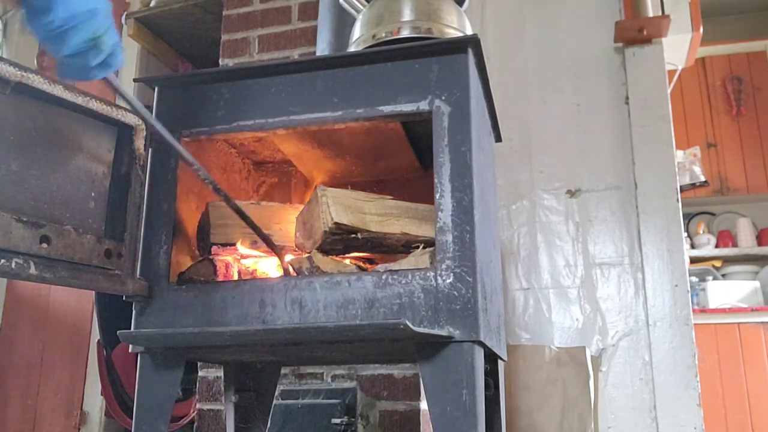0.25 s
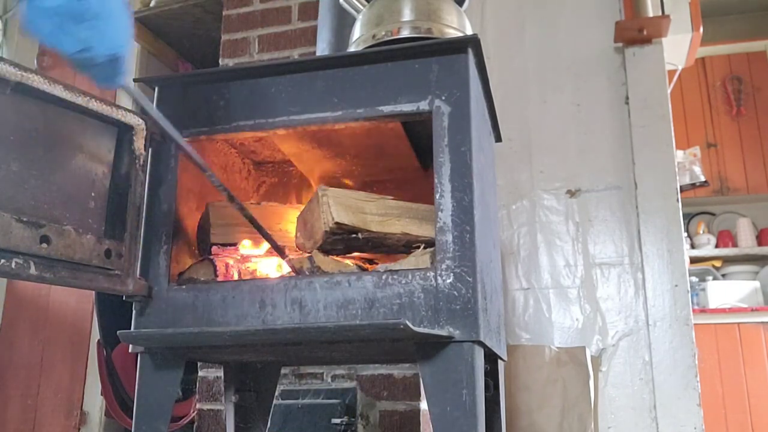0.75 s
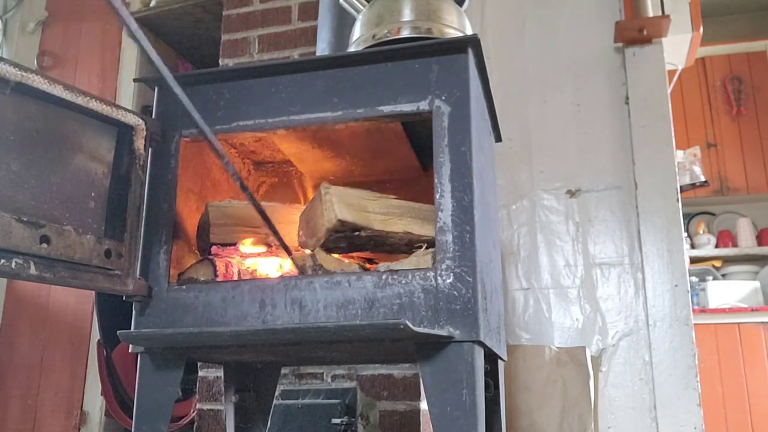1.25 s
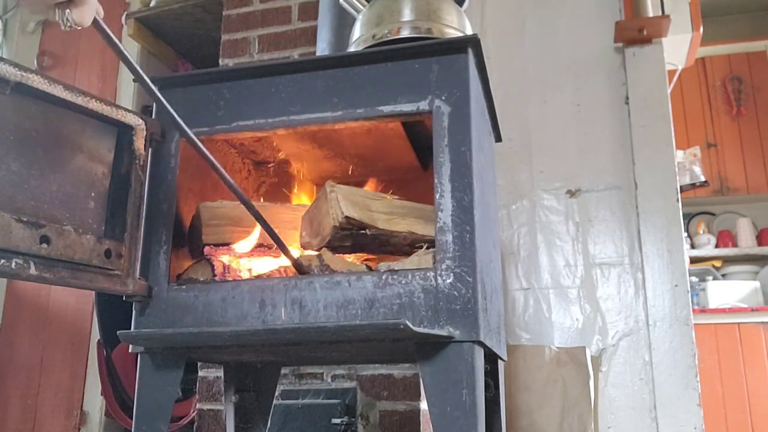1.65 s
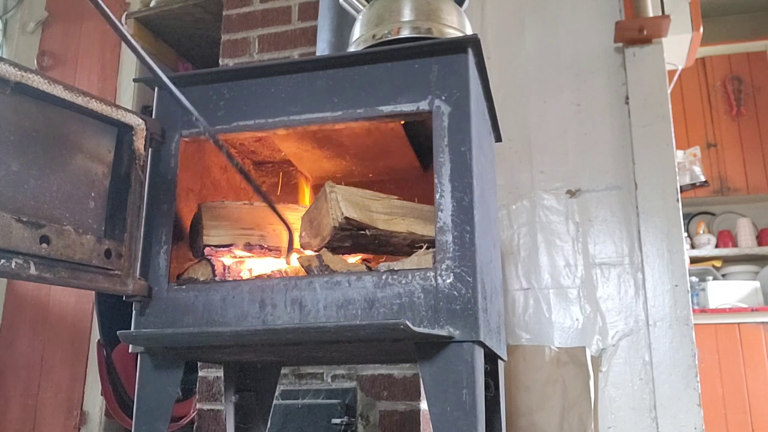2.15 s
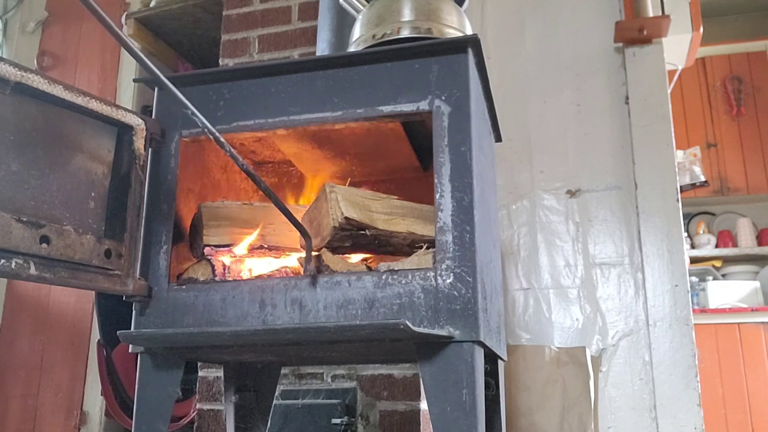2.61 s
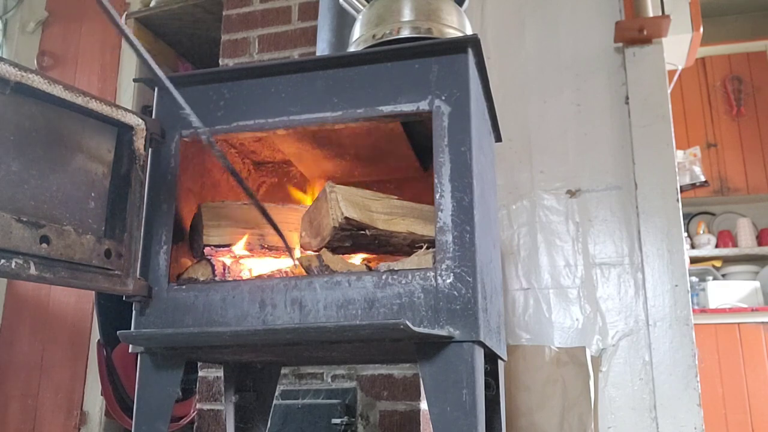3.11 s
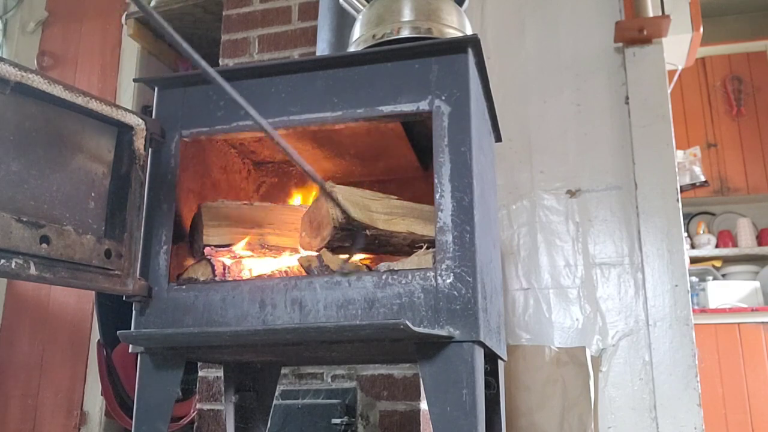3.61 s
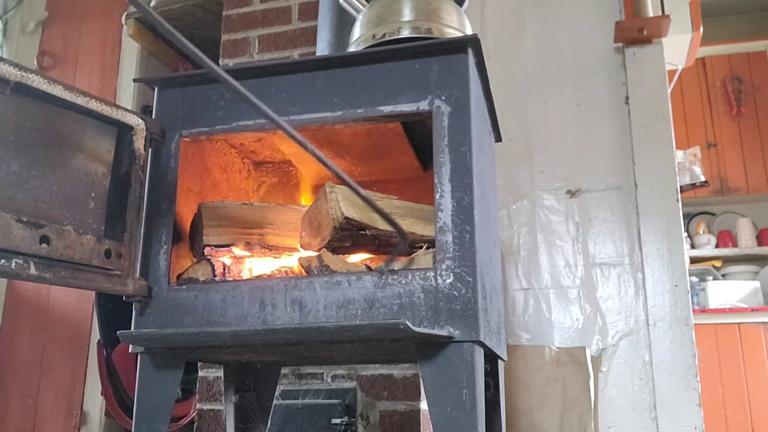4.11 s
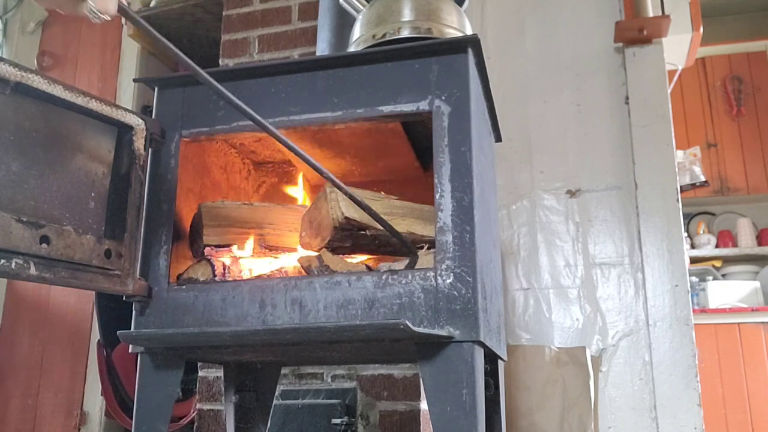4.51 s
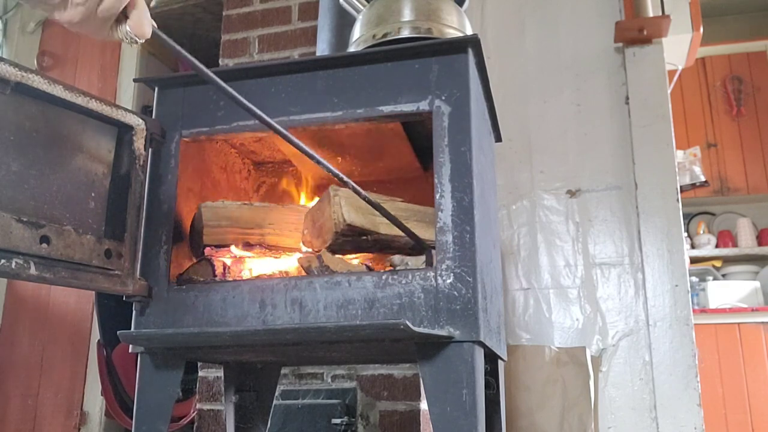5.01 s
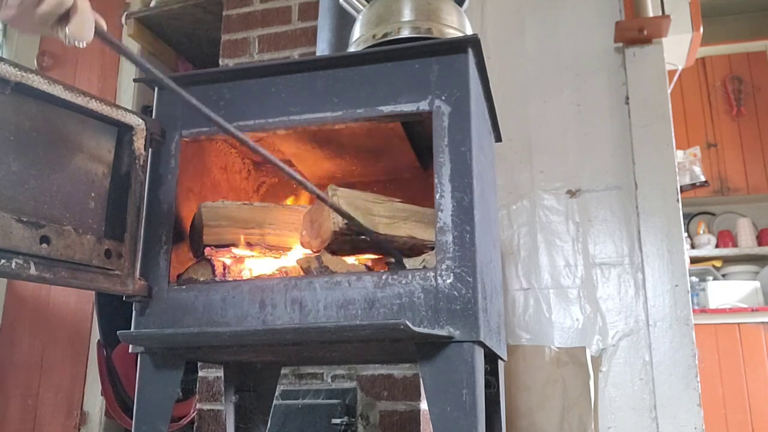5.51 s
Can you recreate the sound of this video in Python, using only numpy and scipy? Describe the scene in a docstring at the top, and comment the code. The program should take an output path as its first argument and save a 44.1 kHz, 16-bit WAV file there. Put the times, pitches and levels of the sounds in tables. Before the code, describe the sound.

Heard near the open door of an indoor wood stove, a metal poker stirs brittle embers and shoves logs. The crunching builds to a sharp, loud clank that echoes briefly in the steel box. Softer ringing knocks, a wooden thump, charcoal ticks and light scraping follow at intervals. Underneath runs the deep rumble and soft hiss of the fire, briefly quieter after the hardest hit.

```python
"""A steel poker knocks against the firebox of an open wood stove, stirs the coals and shoves the logs.
Each knock cracks, rings the plates and the poker, and echoes in the box. Strokes crunch coals and
rasp bark in streams of tiny fractures; logs thud, charcoal snaps. Underneath, the fire rumbles in box
and flue with a soft hiss. The hardest clank ducks the gain control, and the fire slowly swells back."""
import sys
import numpy as np
from scipy import signal
from scipy.fft import rfft, irfft, next_fast_len
from scipy.io import wavfile
from scipy.ndimage import uniform_filter1d, minimum_filter1d

SR = 44100
rng = np.random.default_rng(int(sys.argv[2]) if len(sys.argv) > 2 else 0)


def int16_out(signal):
    """Quantize to a 16-bit WAV file."""
    q = np.round(np.clip(np.atleast_2d(signal).T, -1, 1) * 32767)
    wavfile.write(sys.argv[1], SR, q.astype(np.int16))


N = 253719
TIME = np.arange(N) / SR
TAIL = TIME[:SR * 3 // 5]  # time axis of one impact


# Firebox plate modes: f/Hz, level/dB, t60/s
PLATE_MODES = [(248.5, -13, .35), (363.4, -24, 0.64), (430, -21.5, 0.23), (540, -26.5, 0.67),
               (695, -33, 0.12), (700, -18, 0.22), (895, -15.5, 0.51), (1001, -19.5, 0.68),
               (1059, -23, 0.73), (1177, -31.5, 0.89), (1202, -20, 0.24), (1570, -39.5, 0.22),
               (1480, -30.5, 0.14), (1690, -24.5, 0.31), (1790, -21.5, 0.6)]
# Poker modes: f/Hz, level/dB, t60/s
POKER_MODES = [(2104, -14.5, 0.17), (2213, -21.5, 0.54), (2160, -11.5, 0.28), (2395, -18, 0.27),
               (2483, -11, 0.14), (2860, -27, 0.18), (3440, -16.5, 0.25), (3670, -23, 0.14),
               (3947, -28.5, 0.186), (4570, -26, .15)]
# Blows: t/s, level/dB, rise/s, low cut/Hz, treble corner/Hz, roll-off/(dB/oct),
# plate ring/dB, poker ring/dB, t60 factor
POKER_BLOWS = [(0.238, -23, 0.0058, 540, 1290, 23.5, -14, -13, 1.1),
               (0.423, -23.5, 0.00091, 198, 450, 8.5, -10.5, -10, 2.1),
               (1.381, -11.5, 0.002, 225, 500, 23, -6.5, -23, .85),
               (1.620, 5, 0.00095, 857, 2203, 6.5, -1, 1, 0.94),
               (2.999, -11, 0.0019, 380, 2450, 12, -1.5, -11, 0.76),
               (3.661, -33.5, 0.00083, 380, 1780, 7, -22, -12, 0.74),
               (4.022, -8, 0.00032, 330, 850, 12.5, 0.5, -18, 0.72),
               (4.071, -17.5, 0.0027, 650, 980, 10.5, -10.5, -8, 1.06),
               (4.168, -29.5, 0.0017, 494, 1370, 16, -11, -10, 1.3),
               (4.652, -16, 0.00009, 166, 1530, 24, -7.5, -24, 0.39),
               (5.146, -18, 0.004, 415, 1210, 18, -12, -3, 0.92)]

def blows(echo_db=-1, crack_db=1, crack_t60_s=0.022, ring_db=-3):
    """Each blow cracks, rings the steel and echoes; hard contacts are bright, shoves deep and gradual."""
    out = np.zeros((2, N))
    for s, db, rise_s, low_hz, corner_hz, db_per_oct, plate_db, poker_db, t60_scale in POKER_BLOWS:
        plates = undb(plate_db) * steel_ring(PLATE_MODES, t60_scale)
        poker = undb(poker_db) * steel_ring(POKER_MODES, t60_scale)
        crack = undb(crack_db) * diffuse(len(TAIL)) * fade(TAIL, crack_t60_s)
        hit = crack + undb(echo_db) * echoes(t60_scale) + undb(ring_db) * (plates + poker)
        hit *= 1 - np.exp(-TAIL / rise_s)
        hit = shape(hit, lambda hz: undb(-db_per_oct * np.log2(1 + (hz / corner_hz) ** 4) / 4))
        low_cut = signal.butter(6, low_hz, "high", fs=SR, output="sos")
        add(out, s, undb(db) * signal.sosfilt(low_cut, hit))
    return out


def steel_ring(modes, t60_scale, max_detune=0.01294, twin_gain=0.97):
    """Struck steel: each mode beats against a close twin and reaches the two ports out of step."""
    mid = side = 0
    for hz, db, t60_s in modes:
        start, bearing, detune_angle = rng.uniform(0, 2 * np.pi, 3)
        phase = 2 * np.pi * hz * TAIL + start
        twin_phase = phase * (1 + max_detune * np.cos(detune_angle))
        envelope = undb(db) * fade(TAIL, t60_s * t60_scale)
        mid += envelope * (np.sin(phase) + twin_gain * np.sin(twin_phase))
        side += envelope * side_share(hz) * np.sin(bearing) * np.cos(phase)
    return stereo(mid, side)


# Breaking charcoal spectrum: f/Hz, level/dB
COAL_SPECTRUM = [(300, -27), (1000, -28), (1600, -9.5), (2800, -3), (4500, -1.5), (6000, -4), (8000, -3.5),
                 (11000, -3), (15000, 0)]
# Scraped bark spectrum: f/Hz, level/dB
BARK_SPECTRUM = [(120, -14), (300, -5), (600, 5), (1100, -2.5), (1600, -2.5), (2500, -3), (6000, -22)]
# Strokes: peak t/s, build-up/s, release/s, coal crunch/dB, bark rasp/dB
POKER_STROKES = [(0.081, 0.028, 0.08, -44, -46.5), (0.153, 0.047, 0.036, -37.5, -43),
                 (0.262, 0.13, 0.15, -41.5, -45.5), (0.430, .01, 0.18, -45.5, -50),
                 (0.485, 0.023, 0.26, -49, -47), (0.572, .01, 0.17, -44, -60),
                 (0.990, 0.14, 0.14, -36, -54.5), (1.186, 0.034, 0.15, -27, -61),
                 (1.299, 0.024, 0.069, -29.5, -70), (1.485, 0.28, .09, -31, -36.5),
                 (1.570, .08, 0.15, -32.5, -38), (2.174, 0.089, 0.24, -48.5, -45),
                 (4.830, 0.15, 0.04, -55.5, -51), (5.066, 0.2, 0.049, -40, -50.5),
                 (5.154, 0.12, 0.16, -41, -38.5), (5.605, .015, 0.39, -45, -51)]

def stirring(range_db=21.5, coals_db=-2, bark_db=-0.5):
    """Each stroke builds until the embers give way, then eases; it crunches coals and rasps bark."""
    on_coals = on_bark = 0
    for s, build_s, release_s, crunch_db, rasp_db in POKER_STROKES:
        force = undb(-range_db * np.maximum((s - TIME) / build_s, (TIME - s) / release_s))
        on_coals += undb(crunch_db) * force
        on_bark += undb(rasp_db) * force
    coals = colour(fractures(per_s=570, spread_db=5.5, t60_scale=1), COAL_SPECTRUM)
    bark = colour(fractures(per_s=350, spread_db=4, t60_scale=0.42), BARK_SPECTRUM)
    return undb(coals_db) * unit_rms(coals) * on_coals + undb(bark_db) * unit_rms(bark) * on_bark


def fractures(per_s, spread_db, t60_scale, direct=1):
    """Tiny fractures of uneven size, heard directly and through the firebox."""
    sizes = undb(spread_db * np.minimum(rng.exponential(size=N), 5))
    clicks = (rng.random(N) < per_s / SR) * sizes * rng.choice([-1, 1], N)
    response = echoes(t60_scale) * (1 + direct * fade(TAIL, t60_s=0.0038))
    return unit_rms(signal.fftconvolve(clicks[None], response, axes=1)[:, :N])


# Logs dropping on the bed: t/s, level/dB, f/Hz, swell/s
LOG_DROPS = [(0.425, -28, 255, 0.0027), (1.381, -27.5, 284, 0.0042), (1.498, -25.5, 160, 0.011),
             (3.040, -27.5, 330, 0.0034), (4.032, -13.5, 124, 0.0094)]

def log_thuds():
    """A log lands softly: a few low cycles swell and die."""
    out, t = np.zeros((2, N)), TIME[:SR]
    for s, db, hz, swell_s in LOG_DROPS:
        envelope = undb(db) * t / swell_s * np.exp(1 - t / swell_s)
        add(out, s, stereo(envelope * np.sin(2 * np.pi * hz * t), 0))
    return out


# Charcoal snaps: t/s, level/dB
COAL_SNAPS = [(0.423, -23.5), (0.437, -29.5), (0.569, -27), (0.983, -34), (1.165, -27), (1.412, -34),
              (1.496, -16.5), (1.562, -23), (1.955, -37), (3.602, -40), (4.560, -37), (4.655, -32),
              (4.710, -36.5), (5.109, -29.5), (5.126, -34)]

def coal_snaps(tick_t60_s=0.0065, echo_db=-12):
    """Charcoal breaks with a bright tick and a short echo."""
    out = np.zeros((2, N))
    echo = undb(echo_db) * echoes(t60_scale=0.99)
    for s, db in COAL_SNAPS:
        tick = diffuse(len(TAIL)) * fade(TAIL, tick_t60_s)
        add(out, s, undb(db) * (tick + echo))
    return colour(out, COAL_SPECTRUM)


# Flame rumble spectrum: f/Hz, level/dB
RUMBLE_SPECTRUM = [(15, -72.5), (30, -71.5), (43, -65), (55, -58), (80, -59), (110, -64.5), (150, -62.5),
                   (210, -72), (320, -72.5), (420, -79), (600, -82), (800, -97.5), (1400, -99),
                   (3000, -115)]
# Flame-driven air resonances: f/Hz, half-width/Hz, level/dB
FLUE_MODES = [(64.36, 4.5, -38), (138.2, 18, -46.5), (305, 18.4, -54), (333.7, 5.5, -53)]
# Strength of the draught: t/s, level/dB
DRAUGHT_CURVE = [(0, 4), (0.8, 1), (1.5, 4.5), (2.0, -0.5), (2.7, -2), (3.2, 0), (5.75, 0.5)]
# Wood hiss spectrum: f/Hz, level/dB
HISS_SPECTRUM = [(700, -106), (1500, -103), (2400, -101), (3100, -92), (4500, -94), (6000, -97),
                 (8000, -94.5), (15000, -93.5)]

def fire(rumble_gain_db=43, hiss_gain_db=41, flutter_db=0.12, waver_db=-1.5, sizzle_db=-10):
    """Flames rumble and boom in the box and flue; the wood hisses and sizzles faintly."""
    roar = undb(rumble_gain_db) * colour(diffuse(N), RUMBLE_SPECTRUM)
    for centre_hz, half_width_hz, db in FLUE_MODES:
        boom = shape(diffuse(N), lambda hz: 1 / (1 + ((hz - centre_hz) / half_width_hz) ** 2))
        roar += undb(db) * unit_rms(boom)
    sizzle = undb(sizzle_db) * fractures(per_s=300, spread_db=7.5, t60_scale=0.52, direct=3.9)
    hiss_gain = undb(hiss_gain_db + waver_db * wander(rate_hz=5.52))
    hiss = hiss_gain * colour(diffuse(N) + sizzle, HISS_SPECTRUM)
    draught_db = np.interp(TIME, *np.transpose(DRAUGHT_CURVE))
    return roar * undb(flutter_db * wander(rate_hz=21) + draught_db) + hiss


# Firebox echo decay: f/Hz, t60/s
BOX_DECAY = [(150, 0.71), (500, 0.48), (1000, 0.3), (2000, 0.26), (4000, 0.19), (8000, .19), (14000, 0.12)]

def echoes(t60_scale, room_db=-21, room_stretch=3.08):
    """Dense reflections of the firebox, then the fainter, longer room; the treble dies first."""
    spectrum = rfft(diffuse(len(TAIL)))
    hz = np.maximum(np.fft.rfftfreq(len(TAIL), 1 / SR), 1)
    centres_hz, t60s = np.transpose(BOX_DECAY)
    out = 0
    for weights, t60_s in zip(np.eye(len(t60s)), t60s * t60_scale):
        band = irfft(spectrum * log_interp(np.c_[centres_hz, weights], hz))
        out += band * (fade(TAIL, t60_s) + undb(room_db) * fade(TAIL, t60_s * room_stretch))
    return out


def diffuse(n):
    """White noise arriving from all sides."""
    return stereo(rng.standard_normal(n), shape(rng.standard_normal(n), side_share))


def side_share(hz, blend_hz=1300):
    """Side gain of a diffuse sound: long waves reach both microphone ports alike."""
    return hz / np.hypot(hz, blend_hz)


def stereo(mid, side):
    return np.array([mid + side, mid - side])


def undb(db):
    return 10 ** (np.asarray(db) / 20)


def unit_rms(x):
    return x / x.std()


def fade(t, t60_s):
    return np.exp(-np.log(1000) * t / t60_s)


def wander(rate_hz):
    """Random steps, smoothed twice; spread near 1."""
    hold = int(SR / rate_hz)
    steps = np.repeat(rng.standard_normal(N // hold + 1), hold)
    return np.sqrt(2) * uniform_filter1d(uniform_filter1d(steps, hold), hold)[:N]


def log_interp(points, hz):
    """Read (f/Hz, value) points on a log-frequency axis."""
    points_hz, values = np.transpose(points)
    return np.interp(np.log(hz), np.log(points_hz), values)


def shape(x, gain):
    """Filter by gain(hz)."""
    n = x.shape[-1]
    size = next_fast_len(n + 4096)
    hz = np.maximum(np.fft.rfftfreq(size, 1 / SR), 1)
    return irfft(rfft(x, size) * gain(hz), size)[..., :n]


def colour(x, points):
    """Filter by (f/Hz, level/dB) points."""
    return shape(x, lambda hz: undb(log_interp(points, hz)))


def add(out, start_s, sound):
    i = int(start_s * SR)
    out[:, i:i + sound.shape[1]] += sound[:, :N - i]


def scene():
    """Scraping, fire and knocks, all from the open stove door."""
    return stirring() + fire() + coal_snaps() + blows() + log_thuds()


# Microphone port response: f/Hz, left/dB, right/dB
PORT_RESPONSE = [(99, -0.5, -0.5), (600, 0, -1.13), (2200, 1.5, -3), (4900, 3.5, 2), (6700, 0, 6),
                 (8140, 4.5, 11), (9420, -3.5, 3.5), (11050, -1, -3.5), (13930, 8.5, -1),
                 (14870, -5.5, 4.5)]

def record(dry, limit_db=-13, recover_db_per_s=7.5, sense_s=0.0031, ahead_s=0.0012, top_hz=15750):
    """Port resonances, a look-ahead gain control with slow recovery, and a steep top cut."""
    hz, left_db, right_db = np.transpose(PORT_RESPONSE)
    x = np.array([colour(dry[0], np.c_[hz, left_db]), colour(dry[1], np.c_[hz, right_db])])
    power = uniform_filter1d(np.mean(x ** 2, axis=0), int(sense_s * SR))
    excess_db = 10 * np.log10(np.maximum(power / undb(limit_db) ** 2, 1))
    # gain drops at once on overload, then climbs back steadily
    recovery_db = recover_db_per_s * TIME
    cut_db = np.maximum.accumulate(excess_db + recovery_db) - recovery_db
    ahead = int(ahead_s * SR)
    gain = uniform_filter1d(minimum_filter1d(undb(-cut_db), 2 * ahead), ahead)
    top_cut = signal.ellip(10, 0.2, 80, top_hz, fs=SR, output="sos")
    return signal.sosfilt(top_cut, x * gain)


dry = scene()
out = record(dry)
int16_out(out)
```